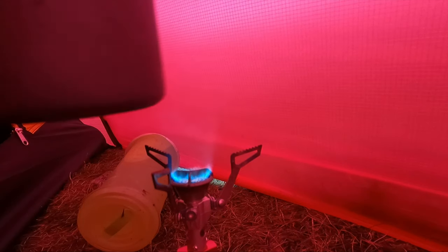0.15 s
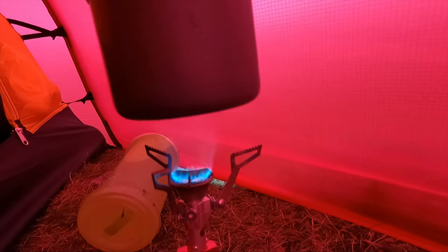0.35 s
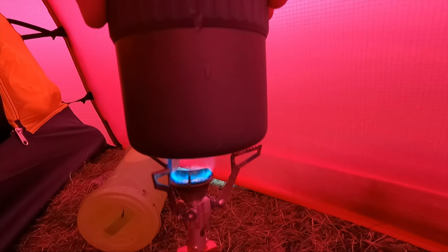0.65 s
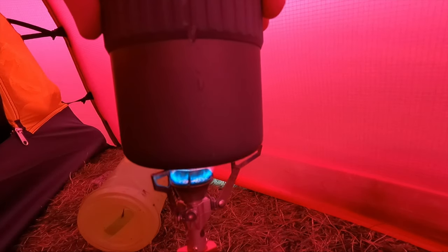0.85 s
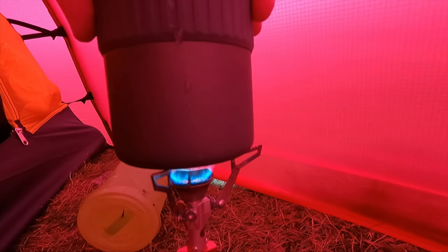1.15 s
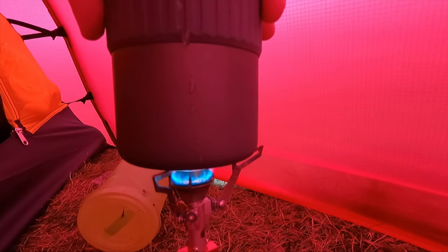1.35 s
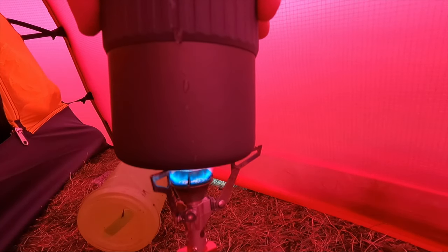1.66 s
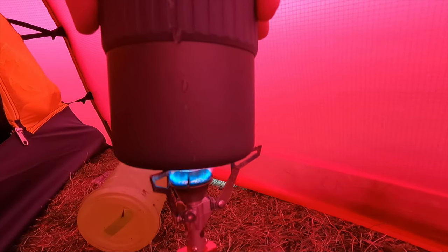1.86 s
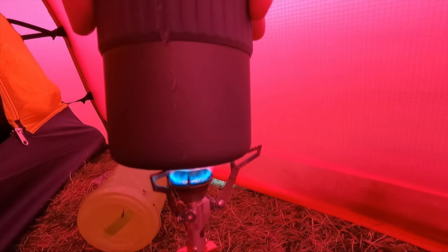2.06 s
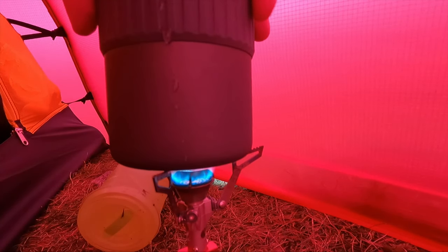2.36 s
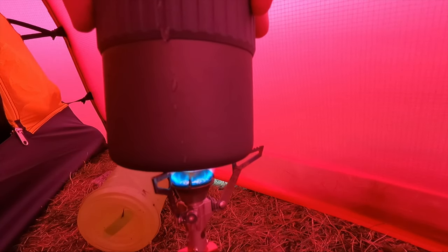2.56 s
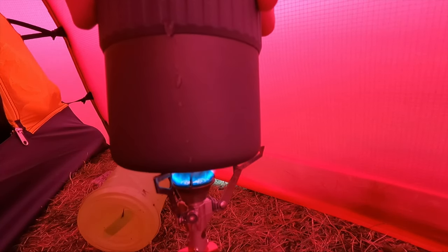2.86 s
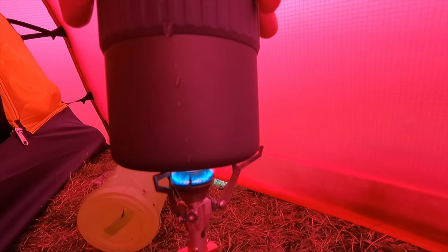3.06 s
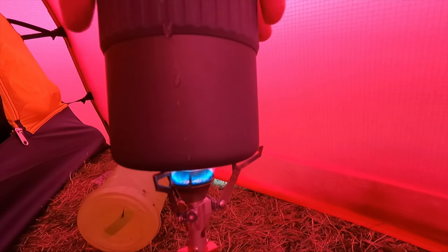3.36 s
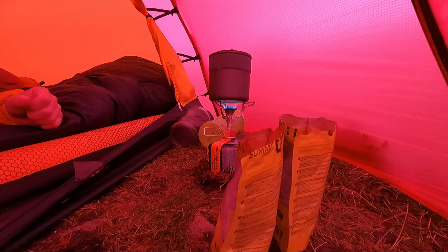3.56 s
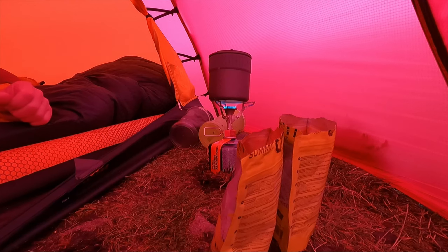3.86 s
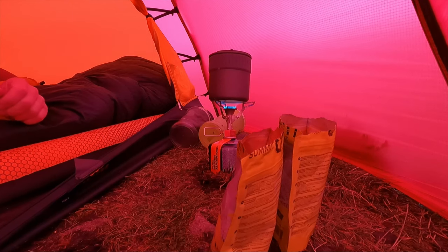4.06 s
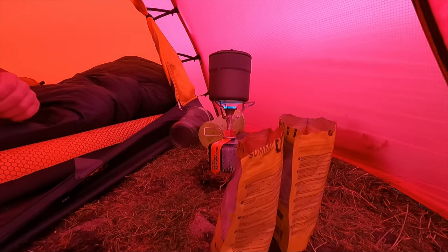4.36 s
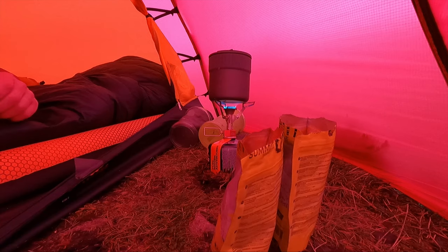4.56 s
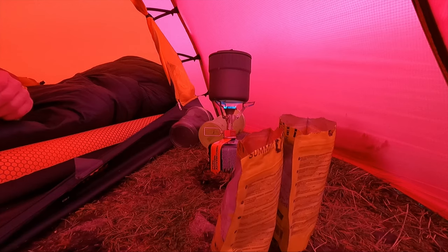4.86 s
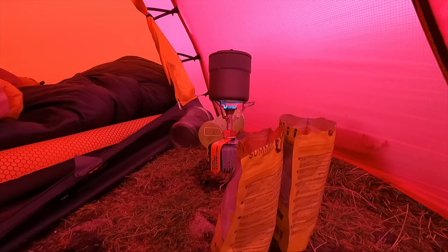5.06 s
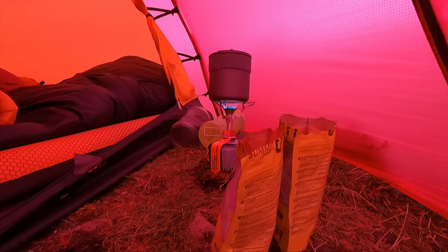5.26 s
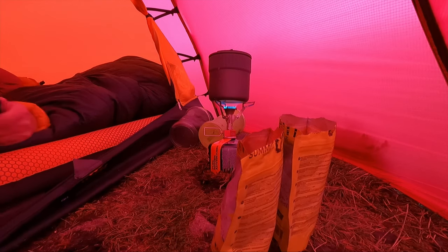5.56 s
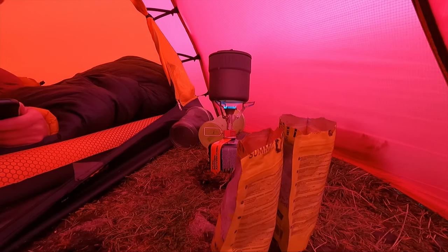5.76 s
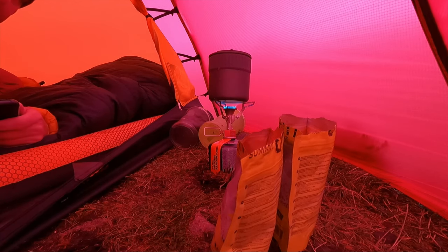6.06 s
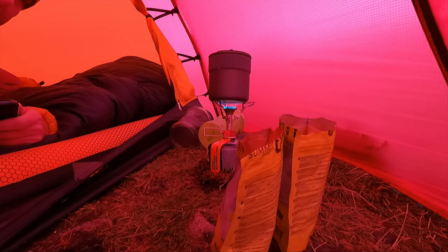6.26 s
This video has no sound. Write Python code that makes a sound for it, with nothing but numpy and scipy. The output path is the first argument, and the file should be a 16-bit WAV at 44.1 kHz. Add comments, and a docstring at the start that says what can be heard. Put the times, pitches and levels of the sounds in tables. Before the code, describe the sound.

Close roar of a camping gas burner, with light ticks and squeaks from a pot, turning quieter and more distant with soft thuds.

```python
"""First the open roar and hissing jet of a small canister gas stove, close to the microphone in a tent.
A metal pot comes down over the turbulent flame and ticks, scrapes and squeals on the stove's arms.
A cross-fade moves the microphone further back, where the roar is duller and quieter. A nylon sleeping
bag rustles, soft thuds sound on the ground, and a thin hiss swells at the end."""
import sys
import numpy as np
from scipy import signal
from scipy.fft import rfft, irfft, next_fast_len
from scipy.io import wavfile
from scipy.ndimage import uniform_filter1d, map_coordinates

SR = 44100
rng = np.random.default_rng(int(sys.argv[2]) if len(sys.argv) > 2 else 0)


def dump_mix(stems):
    """Bounce the given channels to the path in sys.argv[1] as a 16-bit WAV at rate SR."""
    frames = np.atleast_2d(stems).T  # one column per channel
    limited = np.clip(frames, -1, 1)  # hard clip at full scale
    pcm = np.round(limited * 32767).astype(np.int16)
    wavfile.write(sys.argv[1], SR, pcm)


N = 282592
TIME = np.arange(N) / SR


# Broad roar close up, of the open flame and under the pot: f/Hz, level/dB
OPEN_ROAR = [(15, -49), (25, -24), (104, -3), (183, -3.5), (246, -2.5), (368, -1.5), (495, -8),
             (1230, -3.5), (1660, -14.5), (2690, -16), (3000, -22), (4140, -24), (6540, -28), (11200, -40),
             (15500, -60)]
COVERED_ROAR = [(15, -49), (25, -23), (164, -4), (240, -6), (330, -2), (566, -10), (1200, -14),
                (2000, -24.5), (2690, -26), (3520, -20), (3920, -21.5), (4370, -22.5), (4860, -26),
                (9030, -42.5), (12100, -54), (15500, -71)]
# Bands lifted in the open flame, then by burner, pot and ground: f/Hz, width/Hz, level/dB
OPEN_BANDS = [(146, 120, -5), (736, 52, -4), (1200, 190, -5.5), (2040, 190, -13.5), (2670, 67, -13.5),
              (3360, 400, -15.5), (4050, 450, -20), (4970, 210, -22), (6500, 54, -19)]
COVERED_BANDS = [(148, 97, 0), (1284, 425, -3.5), (2237, 70, -17), (2680, 245, -13), (3160, 110, -19),
                 (3850, 310, -16), (4870, 150, -22.5), (5560, 120, -26), (6380, 410, -28),
                 (7300, 180, -30.5), (8900, 190, -38.5), (9600, 160, -39), (11900, 280, -57)]
# Cancellations under the pot: f/Hz, width/Hz, level/dB
COVERED_DIPS = [(570, 77, -5), (1672, 100, -7), (1956, 105, -2.5), (2320, 93, -4), (2990, 140, -2.5),
                (3514, 89, -8.5), (4380, 240, -6.5), (5400, 94, -4), (5800, 80, -10), (6150, 80, 1),
                (7030, 150, -5), (7700, 120, -2.5), (8260, 250, -2), (9250, 120, -3)]
# The flame flares as the pot brushes it: t/s, level/dB, rise/s, hold/s
FLARE = [(.28, 5, .03, .04)]
# Stereo image close up: f/Hz, side over mid/dB, share of side following mid, phase/rad
CLOSE_IMAGE = [(30, -29, 0.1, 3.1), (80, -34, .1, 3.1), (125, -45, .05, 6.1), (257, -17, 1, 3.4),
               (400, -22, .88, 2.6), (577, -14, .85, 2.9), (1020, -15.5, 0.7, 2.6), (1170, -35, .2, 5.5),
               (1470, -10.5, 0.8, 4.36), (2750, -10, .7, 4.54), (4200, -12, .5, 4.4), (6400, -9.5, .3, 4.8),
               (9800, -9.5, 0, 5.4), (15000, -2, 0, 4.6)]

def close_flame(cover_s=(0.35, 0.825), settle_s=(2.0, 3.4)):
    """Turbulent burning right at the microphone, first open, then covered by the pot."""
    free = amp(-0.43) * rush(roar(OPEN_ROAR, OPEN_BANDS, [], body_db=1.5), CLOSE_IMAGE, patchy_db=1)
    free += swells(FLARE, fall_db_per_s=92) * filtered(free, bands([(1290, 190, -6)]))
    covered = rush(roar(COVERED_ROAR, COVERED_BANDS, COVERED_DIPS, body_db=3), CLOSE_IMAGE, 0.62)
    cover = ramp(cover_s)
    burn = np.sqrt(1 - cover) * free + np.sqrt(cover) * covered
    upper_db = -1 - 1.2 * ramp(settle_s)  # sinks as the pot settles on the arms
    burn = balance(burn, upper_db, split_hz=185, drift_db=0)
    flutter_db = 0.31 * wobble(4.23) + 0.37 * wobble(40)
    return amp(-29.5 + flutter_db) * burn


# Broad roar from further back: f/Hz, level/dB
FAR_ROAR = [(15, -24), (25, -1.5), (68, -5), (204, -2), (330, -5), (368, -7.5), (508, -16), (740, -47),
            (969, -24), (1410, -26.5), (1530, -28), (1800, -24), (3080, -27.5), (13200, -57), (15500, -76)]
# Its lifted bands, and cancellations by ground and tent wall: f/Hz, width/Hz, level/dB
FAR_BANDS = [(394, 194, 0), (938, 208, -11), (1346, 62, -23), (1556, 230, -20), (1996, 125, -18),
             (2650, 70, -44), (2960, 64, -23.5), (3400, 99, -25.5), (4320, 300, -28), (5160, 140, -32),
             (5760, 120, -34.5), (7370, 610, -40)]
FAR_DIPS = [(737, 90, -6.5), (1220, 120, -3.5), (1400, 36, -5), (1795, 61, -8), (2150, 42, -4),
            (2535, 86, -8), (2790, 60, -10), (3570, 200, -3)]
# Stereo image further back: columns as CLOSE_IMAGE
FAR_IMAGE = [(30, -42, 0, 4.7), (70, -53, 0.045, 4.7), (400, -57, 0, 3.2), (700, -27, 0.055, 3.5),
             (1300, -21, .3, 5), (2000, -22, .3, 5.4), (2620, -11, .55, 4.6), (4400, -17, .3, 4.8),
             (8000, -8.5, .05, 5.5), (10500, -13, 0.11, 5), (12500, 0, 0.52, 5.2)]
# Two hollow bands swell once: t/s, level/dB, rise/s, hold/s
HOLLOW_SWELL = [(5.8, 0, 0.15, 0.16)]

def far_flame(widen_s=(5.3, 5.85), brighten_s=(4.96, 5.66)):
    """The same burning from further back in the tent; late on it brightens, and the stereo image opens out."""
    burn = rush(roar(FAR_ROAR, FAR_BANDS, FAR_DIPS, body_db=1.5), FAR_IMAGE, patchy_db=0.52)
    hollow = filtered(burn, bands([(960, 110, -8), (1580, 200, -6)]))
    burn += swells(HOLLOW_SWELL, fall_db_per_s=30) * hollow
    side = burn - burn.mean(axis=0)
    # f/Hz, level/dB
    side_lift = [(60, 12), (130, 4), (350, 23), (700, 9.3), (950, 2), (1300, 7), (3000, 3.3), (9000, 3)]
    burn += ramp(widen_s) * filtered(side, lambda hz: amp(along(side_lift, hz)) - 1)
    burn = balance(burn, upper_db=-1 + 2 * ramp(brighten_s), split_hz=600, drift_db=-0.6)
    flutter_db = 0.31 * wobble(7.7) + 0.6 * wobble(45)
    return amp(-38.5 + flutter_db) * burn


# The rumble and the deepest bass surge and sag: t/s, level/dB
RUMBLE_SURGE = [(0, 5.5), (.13, 3), (.4, -1), (.8, -1), (1.1, 2), (1.3, -3.5), (1.55, 2.5), (1.9, -1.3),
                (2.15, 1), (2.45, -1), (3.05, 0.5), (3.3, -1), (3.45, 1), (3.7, -0.5), (4.1, 0), (5, -1.8),
                (5.6, 1.2), (6.4, -0.5)]
BASS_SURGE = [(0, 0), (3.3, -3), (3.7, 4), (4.3, 1), (5.2, -0.5), (6.4, -4)]

def stove(fade_s=(3.565, 4.12)):
    """The flame, cross-faded from the close microphone position to the far one."""
    far = ramp(fade_s)
    burn = (1 - far) * close_flame() + far * far_flame()
    for curve, top_hz in ((RUMBLE_SURGE, 223), (BASS_SURGE, 55)):
        surge = amp(np.interp(TIME, *np.transpose(curve)))
        burn += (surge - 1) * filtered(burn, lambda hz: 1 / (1 + (hz / top_hz) ** 4))
    return burn


# Hiss of the jet, close up: f/Hz, level/dB
JET_HISS = [(2000, -34), (3500, -2), (4500, 3), (6500, -3.5), (8000, -16), (12000, -30), (15500, -45)]
# Its spurts: t/s, level/dB, rise/s, hold/s
SPURTS = [(-.05, -41, .03, 0.11), (.21, -46.5, 0.019, 0.12)]

def gas_jet():
    """The gas jet hisses in bright spurts before the pot covers it."""
    hiss = rush(colour(JET_HISS), CLOSE_IMAGE, patchy_db=1.4)
    return hiss * swells(SPURTS, fall_db_per_s=114) * amp(1.7 * wobble(20.6))


# Pot against the arms: t/s, ring level/dB, length/s, loudest f/Hz, rasp level/dB
CONTACTS = [(0.474, -41, 0.004, 6600, -28.5), (0.959, -25, 0.0018, 3770, -41),
            (1.444, -49, 0.006, 5000, -44), (2.652, -43, 0.012, 4500, -41),
            (2.820, -37, 0.034, 3000, -35.5), (2.873, -36.5, 0.033, 5500, -35)]
# Modes of the pot: f/Hz, level/dB, t60/s
POT_MODES = [(2720, -1, 0.026), (3280, -6, .035), (4020, 1, 0.034), (4450, -3, 0.04), (4980, -13, .02),
             (5400, -11, .03), (6400, -8, 0.016), (6800, -12, .015), (7200, -8, 0.016), (7650, -11, .03),
             (8940, -15, .012)]
# Dry rasp of a contact: f/Hz, level/dB
RASP = [(1500, -5), (4000, -3), (7500, 2.5), (9000, -19), (12500, -16), (14500, -28), (15500, -35)]

def pot(side_db=-10.5, side_rad=4.5):
    """Each contact is a short gritty scrape that rings the pot; drags squeal as well."""
    rings, rasp = np.zeros((2, N + SR))
    t = TIME[:SR // 8]
    for start, db, length, centre_hz, rasp_db in CONTACTS:
        grit = rng.standard_normal(len(t)) * arch(t, length) ** 0.5
        ring = 0
        for hz, mode_db, t60 in POT_MODES:
            mode = struck(t, hz, t60, rise_s=0.0012)
            place_db = -2 * (np.log2(hz / centre_hz) / 0.5) ** 2  # the spot touched favours some modes
            ring += amp(mode_db + place_db) * unit(signal.fftconvolve(grit, mode))
        contact_rms = np.sqrt(np.sum(ring ** 2) / (length * SR))
        add(rings, start, amp(db) * ring / contact_rms)
        add(rasp, start, amp(rasp_db) * grit)
    mid = rings[:N] + squeals() + filtered(rasp[:N], colour(RASP))
    side = filtered(mid, lambda hz: amp(side_db) * np.exp(1j * side_rad))
    return np.array([mid + side, mid - side])


# The pot drags on an arm: t/s, level/dB, length/s, slip f/Hz
DRAGS = [(2.645, -42, .018, 1824), (2.814, -36, 0.035, 1778), (2.866, -34.5, .028, 1830)]
# Harmonics of the squeal: multiple of the slip rate, level/dB
HARMONICS = [(1, 2), (2, 1), (3, -2.5), (4, -5.5), (5, -18), (6, -30), (7, -34)]

def squeals(waver=0.008):
    """Metal sticks and slips at an almost even rate: a short buzzy whistle."""
    out, t = np.zeros(N + SR), TIME[:SR // 8]
    for start, db, length, hz in DRAGS:
        span = round(start * SR) + np.arange(len(t))
        slip_hz = hz * (1 + waver * wobble(150)[span])
        phase = 2 * np.pi * np.cumsum(slip_hz) / SR
        tone = sum(amp(level + 2.5 * wobble(120)[span]) * np.sin(k * phase) for k, level in HARMONICS)
        add(out, start, amp(db) * arch(t, length) * tone)
    return out[:N]


# Thuds on the ground: t/s, level/dB, f/Hz
THUDS = [(4.262, -13.5, 264), (5.238, -23, 336), (5.343, -18, 328), (5.364, -23, 344), (5.489, -17, 170),
         (5.611, -16, 157), (5.713, -15.5, 290)]

def thuds():
    """Soft low knocks that rise in a few milliseconds and die at once."""
    out, t = np.zeros(N + SR), TIME[:SR // 8]
    for start, db, hz in THUDS:
        add(out, start, amp(db) * struck(t, hz, t60=0.033, rise_s=0.0054))
    return out[:N]


# Hiss of rubbing nylon: f/Hz, level/dB
NYLON = [(500, -50), (1400, -19), (2500, -3.5), (5000, -2), (7500, -4), (10000, -15.5), (14000, -17.5),
         (15500, -36)]
# Its stereo image: columns as CLOSE_IMAGE
NYLON_IMAGE = [(1000, -9, .3, 5), (3000, -8, .4, 4.6), (8000, -11, .1, 5.5), (10500, -10, .1, 5),
               (12500, 1.1, .1, 6.4)]
# Slides of the bag, after a faint treble hiss as the microphone moves back: t/s, level/dB, rise/s, hold/s
SLIDES = [(3.7, -62.5, 0.11, 0.19), (4.16, -70, .04, 0.32), (5.075, -58.5, 0.027, .09),
          (5.2, -65, .1, 0.75), (5.36, -65, .1, .04), (5.56, -60.5, 0.14, 0.095)]

def sleeping_bag():
    """Nylon slides in uneven little slips."""
    hiss = rush(colour(NYLON), NYLON_IMAGE, patchy_db=1.8)
    return hiss * swells(SLIDES, fall_db_per_s=60) * amp(0.91 * wobble(35))


# Thin hiss, heard from further back: f/Hz, width/Hz, level/dB
THIN_BANDS = [(4200, 120, -1), (4420, 150, 0), (4700, 130, 2), (5120, 150, -8)]

def thin_hiss(peak_s=6.32, peak_db=-58.5, rise_db_per_s=35, fall_db_per_s=40):
    """A narrow, patchy hiss swells to one peak, perhaps water stirring in the pot."""
    late = TIME - peak_s
    level_db = peak_db + np.minimum(rise_db_per_s * late, -fall_db_per_s * late)
    return amp(level_db) * rush(bands(THIN_BANDS), FAR_IMAGE, patchy_db=3)


def rush(gain, image, patchy_db):
    """Stereo noise of rms 1 with patches of random gain in time and frequency."""
    spectra = signal.stft(rng.standard_normal((2, N)), nperseg=512)[2]
    patches = rng.standard_normal(spectra.shape[1:])
    patches = uniform_filter1d(uniform_filter1d(patches, 6, 0), 10, 1)
    noise = signal.istft(spectra * amp(patchy_db * unit(patches)), nperseg=512)[1]
    mid, other = filtered(noise[:, :N], gain)
    side_db, shares, phases = ([(row[0], row[k]) for row in image] for k in (1, 2, 3))
    width = colour(side_db)
    share = lambda hz: np.clip(along(shares, hz), 0, 1)
    side = filtered(mid, lambda hz: width(hz) * np.sqrt(share(hz)) * np.exp(1j * along(phases, hz)))
    side += filtered(other, lambda hz: width(hz) * np.sqrt(1 - share(hz)))
    return unit(np.array([mid + side, mid - side]))


def roar(body, peaks, dips, body_db):
    """Response of a broad roar with lifted bands on it and dips cut into it."""
    cut_db = lambda hz: sum(db * np.exp(-((hz - f) / width) ** 2) for f, width, db in dips)
    return lambda hz: np.hypot(amp(along(body, hz) + body_db), bands(peaks)(hz)) * amp(cut_db(hz))


def balance(x, upper_db, split_hz, drift_db):
    """Sets the upper roar's level; the rumble below it wanders by drift_db."""
    rumble = filtered(x, lambda hz: 1 / (1 + (hz / split_hz) ** 8))
    return amp(drift_db * wobble(2.18)) * rumble + amp(upper_db) * (x - rumble)


def bands(peaks):
    """Response of steep-sided bands: f/Hz, width/Hz, level/dB."""
    return lambda hz: np.sqrt(sum(
        (amp(db) / (1 + 2 * ((hz - f) / width) ** 2)) ** 2 for f, width, db in peaks))


def colour(points):
    """Response through points: f/Hz, level/dB."""
    return lambda hz: amp(along(points, hz))


def along(points, hz):
    """(f/Hz, value) points read on a log axis."""
    f, value = np.transpose(points)
    return np.interp(np.log(hz + 1), np.log(f + 1), value)


def filtered(x, response):
    """x times a response of frequency."""
    size = next_fast_len(N + SR // 2)
    return irfft(rfft(x, size) * response(np.fft.rfftfreq(size, 1 / SR)), size)[..., :N]


def swells(rows, fall_db_per_s):
    """Gain of events that rise, hold and die away; their powers add."""
    power = 0
    for start, db, rise, hold in rows:
        fall_db = fall_db_per_s * np.maximum(TIME - start - rise - hold, 0)
        power += (ramp((start, start + rise)) * amp(db - fall_db)) ** 2
    return np.sqrt(power)


def struck(t, hz, t60, rise_s):
    """A damped sine with a soft onset."""
    return amp(-60 * t / t60) * (1 - np.exp(-t / rise_s)) * np.sin(2 * np.pi * hz * t)


def arch(t, length):
    """A half-sine envelope."""
    return np.sin(np.pi * np.clip(t / length, 0, 1))


def ramp(span):
    """0 before the span, 1 after it, straight between."""
    return np.interp(TIME, span, [0, 1])


def wobble(rate):
    """A smooth random curve, rate knots a second."""
    return map_coordinates(rng.standard_normal(int(N * rate / SR) + 4), [TIME * rate])


def add(track, start_s, sound):
    """Mixes a sound into a track."""
    track[round(start_s * SR):][:len(sound)] += sound


def amp(db):
    """Gain of a level in dB."""
    return 10 ** (np.asarray(db) / 20)


def unit(x):
    """Scaled to rms 1."""
    return x / np.sqrt(np.mean(x ** 2) + 1e-20)


def scene():
    """Everything that reaches the microphone in the tent."""
    return stove() + gas_jet() + sleeping_bag() + thin_hiss() + pot() + thuds()


def record(dry, top_hz=15650):
    """The camera keeps nothing above its band limit."""
    return filtered(dry, lambda hz: hz < top_hz)


dry = scene()
out = record(dry)
dump_mix(out)
```